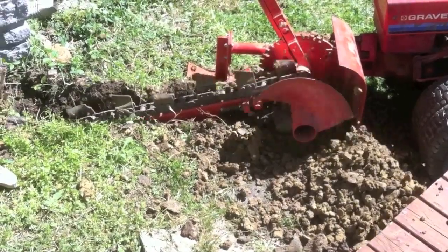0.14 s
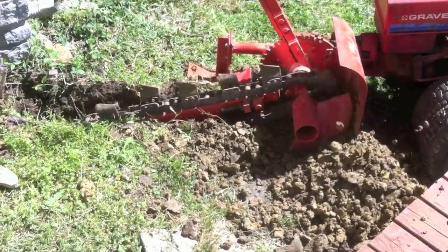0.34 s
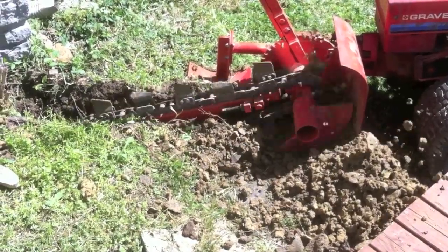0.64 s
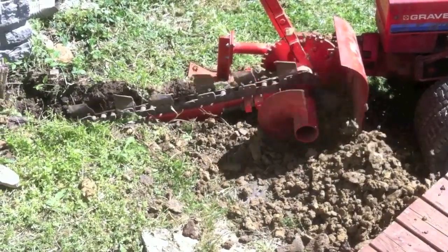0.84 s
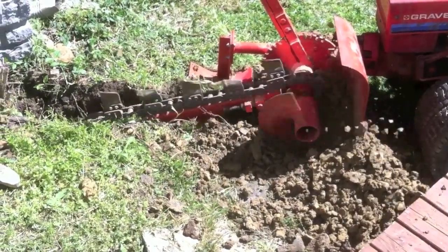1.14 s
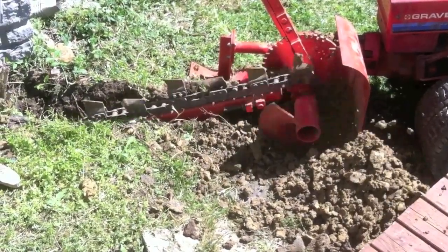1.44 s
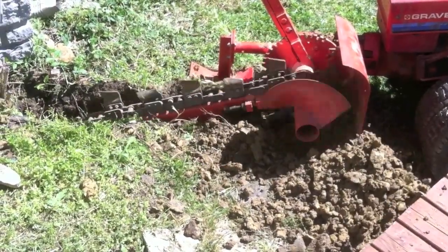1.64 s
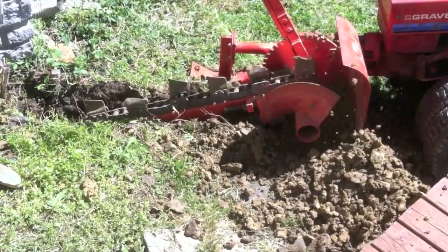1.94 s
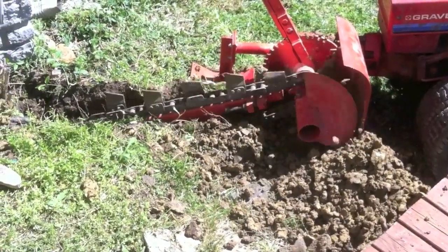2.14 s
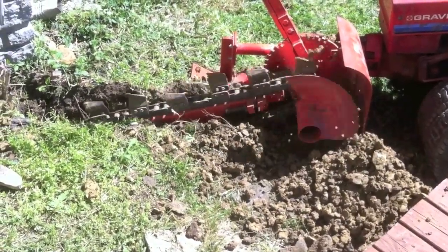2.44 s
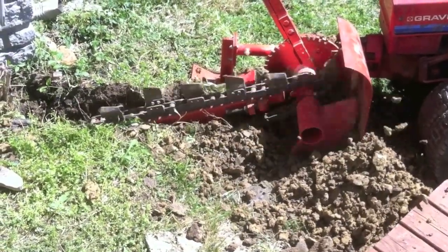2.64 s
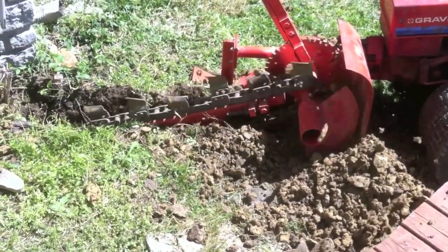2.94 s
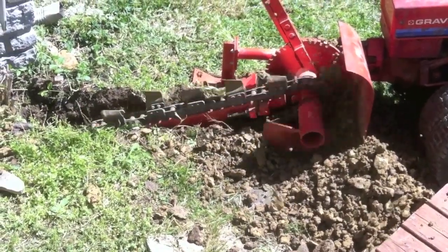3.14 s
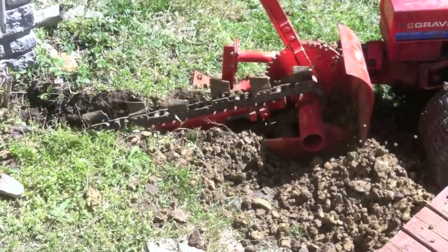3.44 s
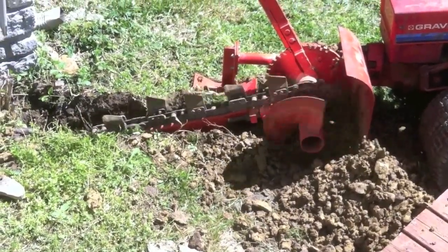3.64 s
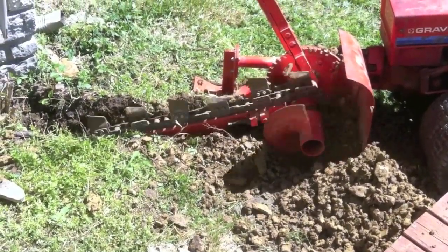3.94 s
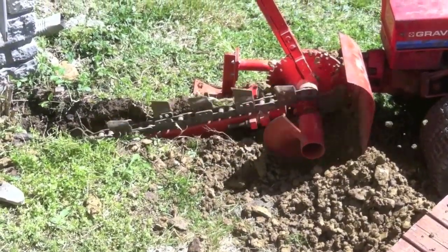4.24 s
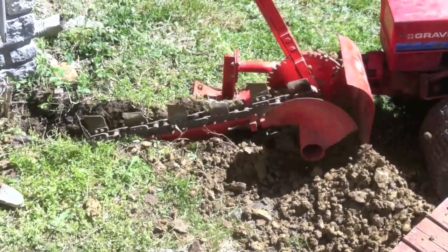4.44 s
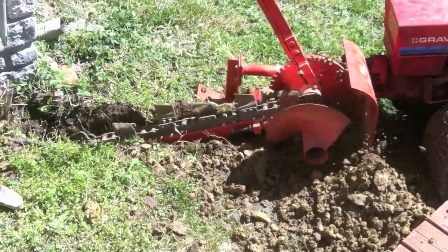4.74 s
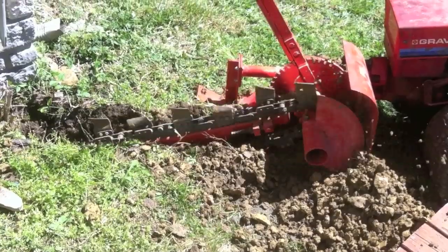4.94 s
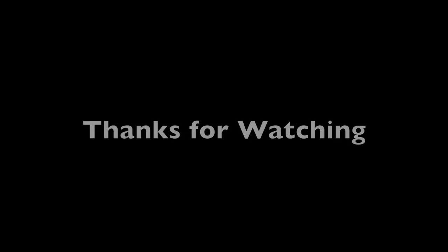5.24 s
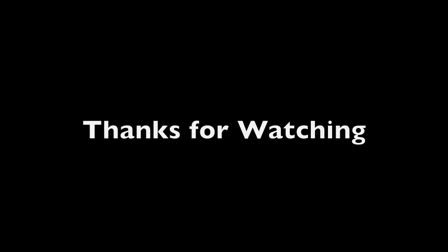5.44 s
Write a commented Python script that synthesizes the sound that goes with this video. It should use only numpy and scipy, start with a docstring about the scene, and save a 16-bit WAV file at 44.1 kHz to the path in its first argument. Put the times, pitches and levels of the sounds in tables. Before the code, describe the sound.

Close, rough small-engine putter with whining gears, a knocking digging chain, brief squeaks and pattering dirt, ending in a quick fade to silence.

```python
"""A one-cylinder garden tractor drives a chain trencher through dry soil, outdoors and close by. It speeds up
over the first 1.2 s: each firing cracks, rings the block and thumps out of the muffler. Fan and gears whine;
the chain knocks, now and then clanking loudly, and squeaks over the patter of soil grains. Now and then the
level dips abruptly and creeps back; at 2.4 s a stone makes the auger ring. The sound fades out at five seconds."""
import sys
import numpy as np
from scipy import signal
from scipy.fft import rfft, irfft, next_fast_len
from scipy.io import wavfile
from scipy.ndimage import uniform_filter1d, minimum_filter1d

SR = 44100
rng = np.random.default_rng(int(sys.argv[2]) if len(sys.argv) > 2 else 0)


def wav_out(sig):
    """Save sig, one row per channel (or a flat mono array), as 16-bit PCM at SR to the path in sys.argv[1]."""
    wavfile.write(sys.argv[1], SR, np.round(np.clip(np.atleast_2d(sig).T, -1, 1) * 32767).astype(np.int16))


N = 246073


def undb(db):
    """Decibels to gain."""
    return 10 ** (np.asarray(db) / 20)


def unit(x):
    """Scale to rms 1."""
    return x / np.sqrt(np.mean(x ** 2))


def curves(table):
    """Each column of a table of (t/s, values) at every sample."""
    s, *columns = np.transpose(table)
    return [np.interp(np.arange(N) / SR, s, c) for c in columns]


def walk(rate):
    """Random wandering with a spread near 1, through `rate` random points a second."""
    knots = rng.standard_normal(4096)
    return 1.31 * np.interp(np.arange(N) / SR * rate, np.arange(len(knots)), knots)


def resonate(x, hz, width):
    """One resonance, gain 1 at its centre."""
    return signal.lfilter(*signal.iirpeak(hz, hz / width, fs=SR), x)


def ring(x, modes):
    """A body that rings in all its modes; neighbours swing in opposite senses."""
    out = 0
    for k, (hz, width, db) in enumerate(modes):
        out = out + (-1) ** k * undb(db) * resonate(x, hz, width)
    return out


def highpass(x, hz):
    """Steep cut of the bass."""
    return signal.sosfilt(signal.butter(4, hz, "high", fs=SR, output="sos"), x)


def colour(x, points):
    """Shape a sound by a spectrum of (f/Hz, level/dB) points."""
    hz, db = np.transpose(points)
    size = next_fast_len(N)
    log_hz = np.log(np.arange(size // 2 + 1) * SR / size + 1)
    gain = undb(np.interp(log_hz, np.log(hz), db))
    return irfft(rfft(x, size) * gain, size)[:N]


def grains(rate, spread_db):
    """Random tiny impacts; a positive spread makes a few much louder, a negative one much fainter."""
    hit = rng.random(N) < rate / SR
    size = undb(spread_db * np.minimum(rng.exponential(size=N), 4))
    return unit(hit * rng.choice([-1, 1], N) * size)


def each_cycle(cycles):
    """A random value drawn anew for every whole number of turns."""
    return rng.standard_normal(256)[cycles.astype(int)]


def pulses(cycles, place, scatter_db, jitter):
    """One blow per cycle at the given place, a little uneven in size and timing."""
    late = jitter * walk(25)
    count = np.floor(cycles - place - late)
    wraps = np.diff(count, prepend=count[0]) > 0
    return wraps * undb(scatter_db * each_cycle(cycles))


# engine speed: (t/s, f/Hz of the firings)
ENGINE_SPEED = [(0, 21.3), (.6, 21.59), (1.18, 24.34), (1.45, 24.54), (1.8, 24.1), (2.2, 24.51),
                (2.4, 24.38), (2.75, 24.62), (3.35, 24.3), (4.5, 24.55), (4.7, 24.12), (5.05, 24.1)]


def engine_speed():
    """Firings per second; one firing is one engine cycle."""
    firing_hz, = curves(ENGINE_SPEED)
    return firing_hz


# engine effort, heard as the sharpness of the firings: (t/s, level/dB)
ENGINE_EFFORT = [(0.03, -29), (0.5, -28.5), (0.77, -20.5), (0.9, -23), (1.2, -24.5), (1.95, -28),
                 (2.11, -25), (2.5, -29), (2.9, -30.5), (3.5, -24), (4.5, -29.5), (4.75, -24)]
# single firings that bang harder: (t/s, extra level/dB)
HARD_BANGS = [(.31, 1.5), (.59, 3), (.77, 1.5), (.86, 2), (1.49, 0), (1.65, 2.5), (2.72, 5), (3.53, 1.5),
              (3.74, 2), (3.82, 4.5), (3.985, 2.5), (4.845, 2.5), (4.93, 2.5)]


def effort(cycles):
    """Level of the firing crack in dB: it follows the effort, and a hard bang lifts one whole cycle."""
    effort_db, = curves(ENGINE_EFFORT)
    firing = np.floor(cycles)
    return effort_db + sum(db * (firing == firing[int(s * SR)]) for s, db in HARD_BANGS)


# spectrum of the firing hiss: (f/Hz, level/dB)
HISS_SPECTRUM = [(500, -15), (1400, -5.5), (2000, 0), (3100, 2), (4000, -1.5), (5000, -3.5), (6100, -4.5),
                 (7300, -1), (8300, 1.5), (9600, -5), (11500, -9.5), (16000, -19.5)]
# thin muffler shell, rung by every firing: (f/Hz, width/Hz, level/dB)
SHELL_MODES = [(3080, 79, -5.5), (3580, 73, -5), (4020, 74, -2), (4360, 53, -1.5), (5300, 81, -8),
               (8040, 83, -8.5)]


def crack(cycles, level_db, snap=.45, tail_decay=0.27, tail_db=6, tick_db=-17, jitter=0.011):
    """Each firing spits a sharp hiss that rings the muffler shell; a valve ticks later in the cycle."""
    # in parts of a cycle
    start, usual_rise, tick_place, tick_width = .028, .058, .68, .04
    # the harder the firing, the shorter and steeper its burst
    shorten = undb(-snap * (level_db - level_db.mean()))
    rise = usual_rise * shorten
    since = (cycles - start - jitter * walk(25)) % 1
    burst = (since / rise) ** 1.5 * np.exp(1.5 * (1 - since / rise)) / np.sqrt(shorten)
    tail = undb(tail_db) * (1 - np.exp(-since / rise)) * np.exp(-since / tail_decay)
    tick = undb(tick_db) * np.exp(-((cycles % 1 - tick_place) / tick_width) ** 2)
    # the gas leaves in ragged spurts
    strength = undb(1.14 * each_cycle(cycles) + 0.7 * walk(350))
    hiss = colour((burst + tail + tick) * strength * rng.standard_normal(N), HISS_SPECTRUM)
    shell = np.zeros(N)
    for hz, width, db in SHELL_MODES:
        # each firing favours other modes of the shell
        favour = undb(db + 3 * each_cycle(cycles))
        spray = burst * strength * rng.standard_normal(N)
        shell += favour * resonate(spray, hz, width)
    return unit(hiss) + undb(-7.5) * unit(shell)


EXHAUST_DB = -21.5


def exhaust(cycles):
    """The exhaust valve lets a slug of gas into the muffler, which booms in its chamber and tailpipe."""
    opening, chamber_width_hz = .025, 62  # opening: place in the cycle, 0-1
    slug = pulses(cycles, opening, scatter_db=0.5, jitter=0.0014)
    chamber = resonate(resonate(slug, 148.0, chamber_width_hz), 152.4, chamber_width_hz)
    tailpipe = resonate(resonate(slug, hz=248.4, width=56), hz=259.7, width=46)
    return unit(highpass(chamber + undb(-5.5) * tailpipe, hz=115))


# blows of piston and valves in every cycle: (place in the cycle 0-1, level/dB)
ENGINE_BLOWS = [(0.036, 0.5), (0.338, -4.5), (.51, -3.5), (0.752, -5), (0.858, -2.5), (0.955, -6.5)]
# engine block and its sheet metal: (f/Hz, width/Hz, level/dB)
BLOCK_MODES = [(297.3, 17.7, 1), (389, 9.7, 5.5), (436, 37, 4.5), (483, 30.4, 5), (557, 57, 0),
               (618, 47, 0.5), (657, 28, 0.5), (1080, 380, -17)]
BLOCK_DB, BLOCK_WANDER_DB = -22, 0.17


def block(cycles):
    """Piston and valve blows ring the block; loose sheet metal buzzes along."""
    blows = np.zeros(N)
    for place, db in ENGINE_BLOWS:
        blows += undb(db) * pulses(cycles, place, scatter_db=3.0, jitter=0.0044)
    buzz = grains(rate=500, spread_db=4.5)
    return unit(highpass(ring(unit(blows) + undb(-7.5) * buzz, BLOCK_MODES), hz=234.3))


# gears and shafts of the drive: (f/firing rate, level/dB at full speed,
# loss/dB for each firing a second below full speed, extra level/dB at full pull)
DRIVE_GEARS = [(10, -28, 5, -4), (14, -41, -2.3, -6), (19, -40, 0, 8), (22, -41, 0, 9), (25, -32.5, 1, 0),
               (28, -41, 0, 4)]
# the fan grows loud as its blade rate climbs into the resonance of its shroud
FAN_DB, SHROUD_HZ, SHROUD_WIDTH_HZ = -28, 875, 35


def whine(cycles, firing_hz):
    """Fan blades sing in the shroud; gear teeth hum, some swelling, some fading as speed builds."""
    blades, full_pull = 36, 4  # blade passes per cycle; speed gain in Hz a second
    speed_gain = uniform_filter1d(np.gradient(firing_hz) * SR, size=12000)
    pull = np.clip(speed_gain / full_pull, 0, 1)
    slow_hz = firing_hz.max() - firing_hz
    shroud = 1 / np.hypot(1, 2 * (blades * firing_hz - SHROUD_HZ) / SHROUD_WIDTH_HZ)
    fan_tone = np.sin(2 * np.pi * blades * cycles + 0.29 * walk(30))
    fan = fan_tone * shroud * undb(FAN_DB + 1.5 * walk(18))
    gears = np.zeros(N)
    for teeth, db, slope, extra_db in DRIVE_GEARS:
        hum = np.sin(2 * np.pi * teeth * cycles + 0.45 * walk(12))
        gears += hum * undb(db - slope * slow_hz + extra_db * pull + 3.6 * walk(7))
    return np.sqrt(2) * (fan + gears)


def flurry(since, attack_s=0.0053, decay_s=0.014):
    """Envelope of the steel contacts that follow a knock."""
    return (1 - np.exp(-since / attack_s)) * np.exp(-np.minimum(since / decay_s, 20))


# chain, boom and auger steel: (f/Hz, width/Hz, level/dB)
STEEL_MODES = [(1291, 48, -3.5), (1653, 110, -1.5), (1860, 66, 3.5), (2066, 96, 3), (2330, 180, -2.5),
               (2756, 39, 0.5), (2860, 40, -6), (3126, 310, -6.5), (3570, 85, -6), (4080, 140, -8.5),
               (4680, 120, -6.5), (5320, 2300, -13.5), (9500, 2700, -18)]
# louder knocks of the chain, each with its own ring: (t/s, level/dB, f/Hz of the ring)
LOUD_KNOCKS = [(0.099, -2.5, 3040), (0.316, -5, 1870), (0.429, -2.5, 1870), (0.598, -3.5, 1780),
               (0.739, -0.5, 1880), (0.864, -3, 4050), (1.121, -2.5, 3400), (1.351, -3.5, 2700),
               (1.882, -2.5, 2680), (2.871, -8, 1830), (3.48, -9.5, 4580), (3.682, -2.5, 2930),
               (3.85, -5.5, 1870), (4.131, -5, 3140), (4.7, -3, 4160)]
# the chain jostles harder as the engine runs faster: level at full speed, slope per firing a second
RATTLE_DB, RATTLE_DB_PER_HZ = -27, 0.45
# a link knocks over the geared sprocket every few firings, at a place 0-1 in that period
FIRINGS_PER_KNOCK, KNOCK_PLACE = 3.42, .8
KNOCK_DB, KNOCK_SCATTER_DB, KNOCK_HZ = -11.5, 3.5, 2935


def chain(cycles, firing_hz, lead_s=.012, ring_width_hz=130):
    """Links jostle and knock over the sprocket in step with the engine; some knocks clank louder, each with its
    own ring."""
    t = np.arange(N) / SR
    chatter = grains(rate=1200, spread_db=1.0)
    passed = cycles / FIRINGS_PER_KNOCK - KNOCK_PLACE + 1
    since_knock = passed % 1 * FIRINGS_PER_KNOCK / firing_hz
    knock_gain = undb(KNOCK_DB + KNOCK_SCATTER_DB * each_cycle(passed))
    knocks = chatter * flurry(since_knock) * knock_gain
    cutters = resonate(knocks, KNOCK_HZ, ring_width_hz)
    for s, db, hz in LOUD_KNOCKS:
        # a clank sets in shortly before its listed time
        clank = chatter * undb(db) * flurry(np.maximum(t - s + lead_s, 0))
        knocks += clank
        cutters += resonate(clank, hz, ring_width_hz)
    rattle_db = RATTLE_DB + RATTLE_DB_PER_HZ * (firing_hz - firing_hz.max()) + 2 * walk(40)
    links = grains(rate=1100, spread_db=-1.5) * undb(rattle_db)
    contacts = links + undb(-13) * knocks
    steel = unit(highpass(ring(contacts, STEEL_MODES), hz=920)) * np.std(contacts)
    return steel + undb(6) * cutters + undb(-23.5) * highpass(knocks, hz=4500)


# dry chain pins squeak: (t/s, f/Hz, level/dB)
PIN_SQUEAKS = [(.109, 10600, -23), (.156, 4565, -19.5), (0.364, 10030, -14), (1.438, 10040, -20.5),
               (1.822, 10100, -19.5), (2.045, 10070, -18), (4.076, 10250, -28.5), (4.582, 10350, -19)]
SQUEAK_S = 0.0068  # half the length of a squeak


def squeaks(waver=0.016, ring_width_hz=35, ring_db=-1):
    """Short, rough chirps of steel sliding on steel; the pin rings on after each."""
    t = np.arange(N) / SR
    bend = np.cumsum(1 + waver * walk(900)) / SR  # time that runs unevenly, so the pitch wavers
    out = np.zeros(N)
    for s, hz, db in PIN_SQUEAKS:
        swell = np.exp(-np.minimum(((t - s) / SQUEAK_S) ** 2, 20))
        slip = undb(db) * swell * np.sin(2 * np.pi * hz * bend)
        out += slip + undb(ring_db) * resonate(slip, hz, ring_width_hz)
    return out


# steel flight of the auger: (f/Hz, t60/s, level/dB)
AUGER_MODES = [(1940, 0.076, 7), (2640, 0.14, -7), (2910, 0.24, 2), (3160, .08, -7), (3320, 0.08, 5.5),
               (4620, .16, 0), (5340, .13, -8)]
STONE_S, STONE_DB = 2.386, -17


def stone(contact_s=0.008, chip_db=-1):
    """A stone chips against the auger, whose steel rings on briefly."""
    since = np.maximum(np.arange(N) / SR - STONE_S, 0)
    clang = np.zeros(N)
    for hz, t60, db in AUGER_MODES:
        clang += undb(db - 60 * np.minimum(since / t60, 3)) * np.sin(2 * np.pi * hz * since)
    contact = (since > 0) * np.exp(-np.minimum(since / contact_s, 20))
    chip = contact * highpass(rng.standard_normal(N), hz=1504)
    return undb(STONE_DB) * (clang + undb(chip_db) * chip)


# spectrum of scraped and falling soil: (f/Hz, level/dB)
SOIL_SPECTRUM = [(25, -13), (90, -8.5), (200, -1), (320, 5), (520, 3.5), (800, -1), (1100, 1.5),
                 (1450, -5.5), (2000, -2), (4500, -17), (9000, -36), (15500, -57.5)]
SOIL_DB = -24


def soil():
    """Cutters scrape the trench and crumbs tumble off the auger: a dense patter of grains."""
    crumbs = grains(rate=3500, spread_db=0) * undb(1.1 * walk(18))
    return unit(colour(crumbs, SOIL_SPECTRUM))


# the whole sound drops abruptly and creeps back: (t/s, depth/dB)
LEVEL_DIPS = [(.335, 1.5), (.63, 2.65), (1.26, 1.4), (1.655, 0.5), (2.405, 3.5), (3.55, 3.5), (4.43, 0.5),
              (4.7, 3)]
DIP_RECOVERY_S = 0.48


def dips(drop_s=.008):
    """Gain of the whole sound: each dip sets in abruptly and wears off slowly."""
    t = np.arange(N) / SR
    down_db = np.zeros(N)
    for s, depth_db in LEVEL_DIPS:
        since = np.maximum(t - s, 0)
        down_db += depth_db * (1 - np.exp(-since / drop_s)) * np.exp(-since / DIP_RECOVERY_S)
    return undb(-down_db)


def scene():
    """Engine and trencher together, dry in the open air."""
    firing_hz = engine_speed()
    cycles = .46 + np.cumsum(firing_hz) / SR
    crack_db = effort(cycles)
    engine = crack(cycles, crack_db) * undb(crack_db)
    engine = engine + exhaust(cycles) * undb(EXHAUST_DB)
    engine = engine + block(cycles) * undb(BLOCK_DB + BLOCK_WANDER_DB * walk(7))
    engine = engine + whine(cycles, firing_hz)
    trencher = chain(cycles, firing_hz) + squeaks() + stone() + soil() * undb(SOIL_DB)
    return ((engine + trencher) * dips())[None]


def limit(x, release_db_per_s=60):
    """Peaks above the ceiling pull the gain down just ahead of them; it then recovers steadily."""
    ceiling_db = -2.8
    over_db = np.maximum(20 * np.log10(np.abs(x) + 1e-9) - ceiling_db, 0)
    recovery = release_db_per_s * np.arange(N) / SR
    gain_db = recovery - np.maximum.accumulate(over_db + recovery, axis=-1)
    return x * undb(uniform_filter1d(minimum_filter1d(gain_db, size=65), size=65))


FADE_START_S, FADE_END_S, TOP_HZ = 4.972, 5.068, 16000


def record(dry):
    """The loudest peaks are limited, the sound is faded out and the top is cut."""
    fade = np.interp(np.arange(N) / SR, [FADE_START_S, FADE_END_S], [1, 0])
    held = limit(undb(1.26) * dry)
    top_cut = signal.ellip(10, .2, 80, TOP_HZ, fs=SR, output="sos")
    return signal.sosfilt(top_cut, held * fade)


dry = scene()
out = record(dry)
wav_out(out)
```